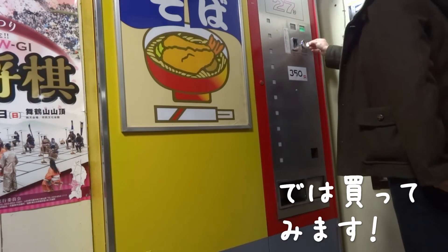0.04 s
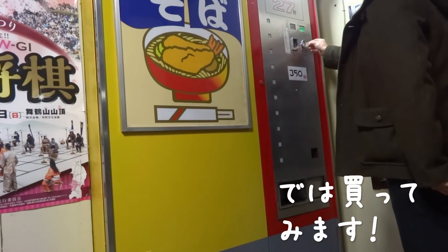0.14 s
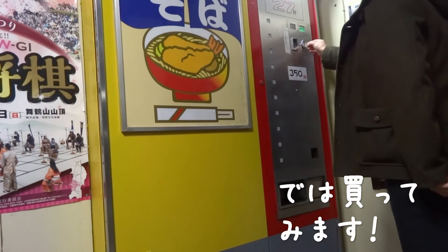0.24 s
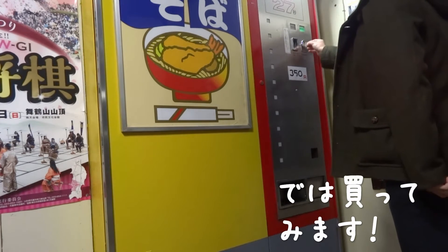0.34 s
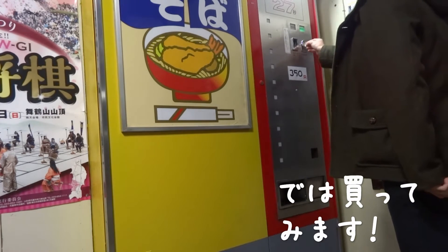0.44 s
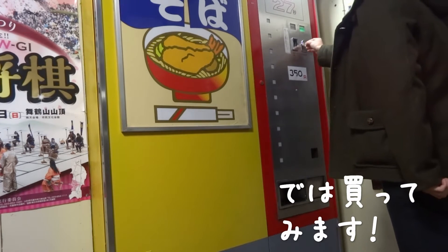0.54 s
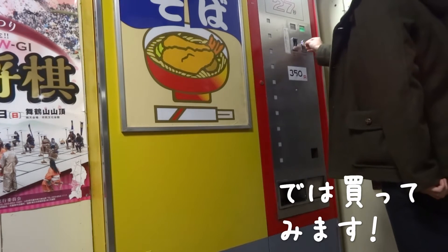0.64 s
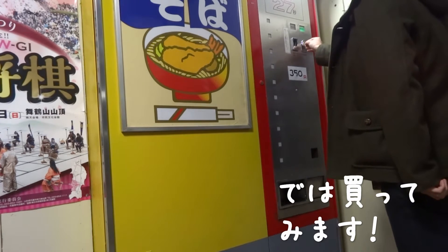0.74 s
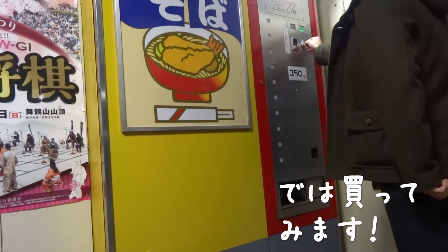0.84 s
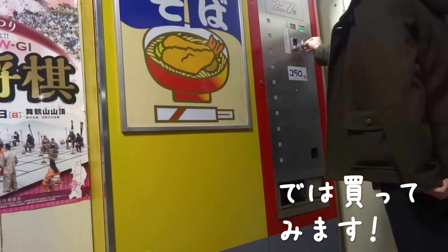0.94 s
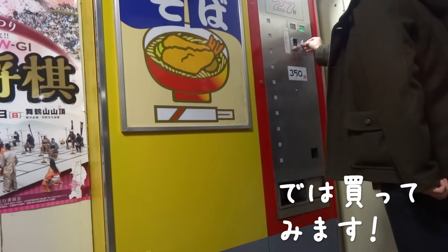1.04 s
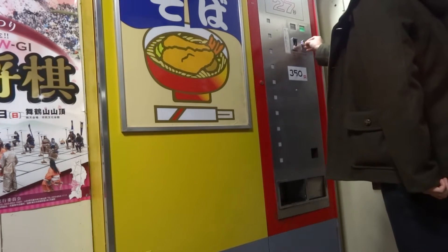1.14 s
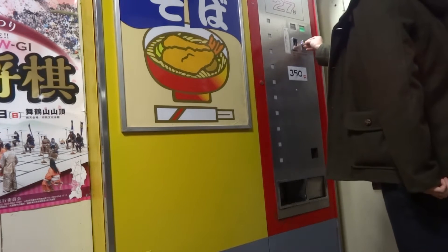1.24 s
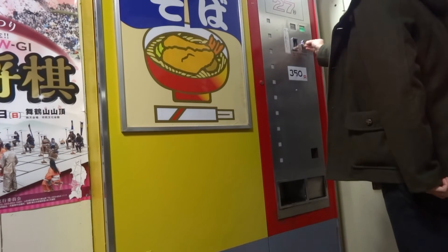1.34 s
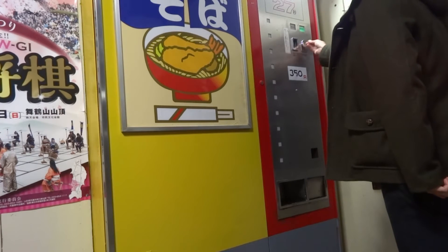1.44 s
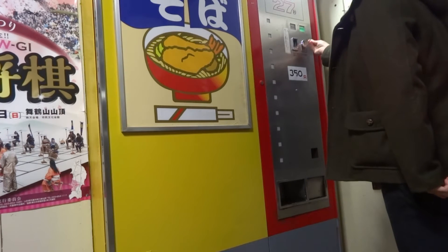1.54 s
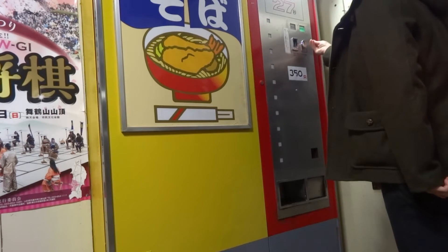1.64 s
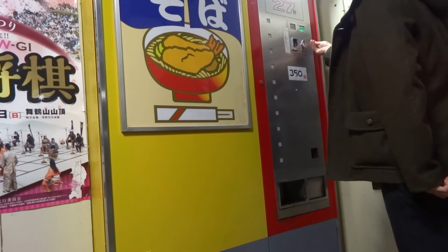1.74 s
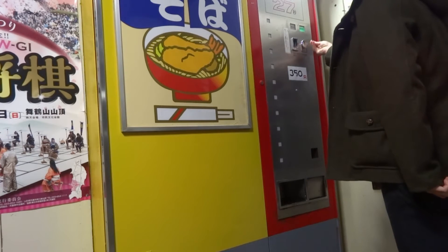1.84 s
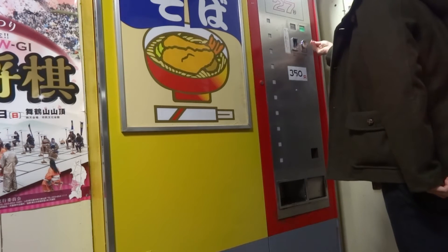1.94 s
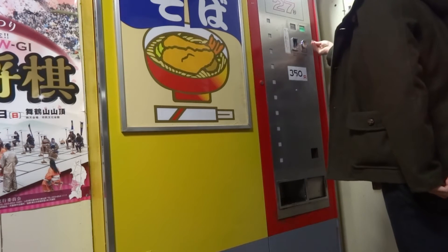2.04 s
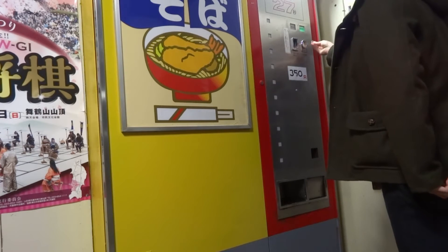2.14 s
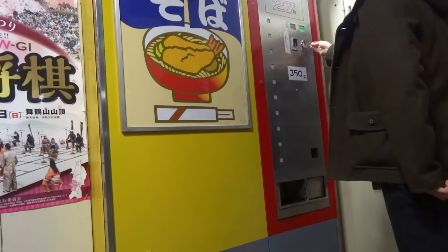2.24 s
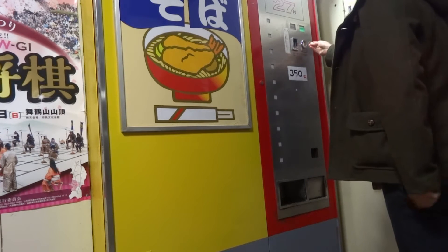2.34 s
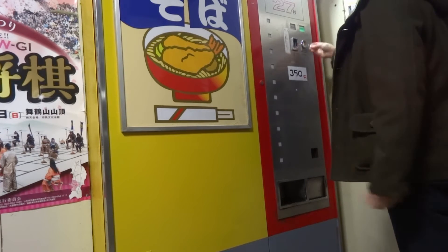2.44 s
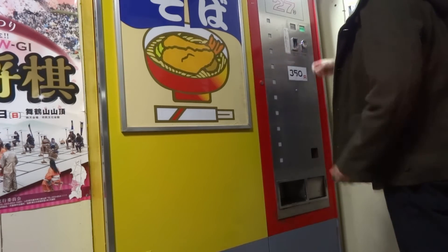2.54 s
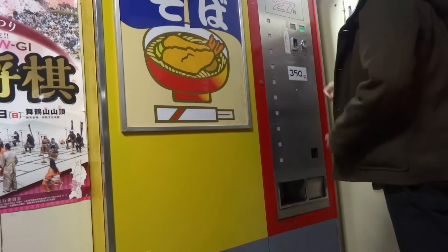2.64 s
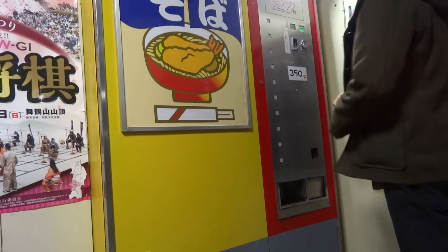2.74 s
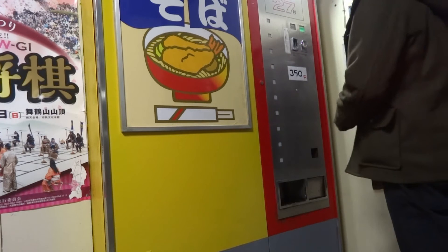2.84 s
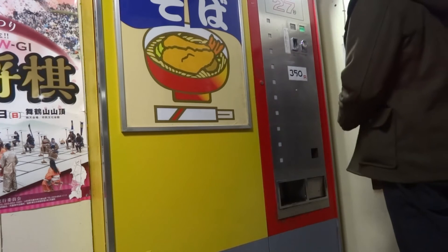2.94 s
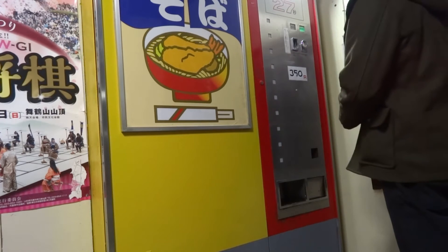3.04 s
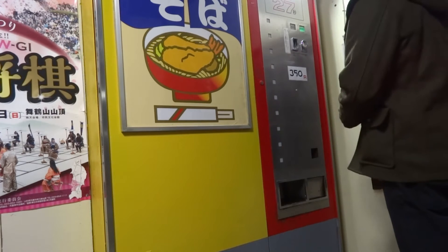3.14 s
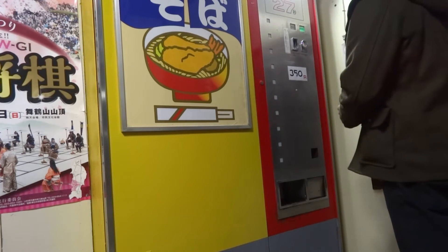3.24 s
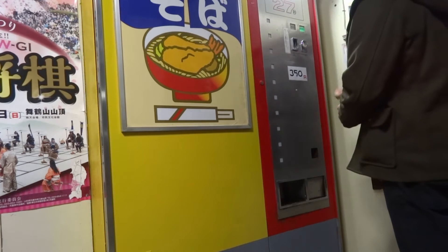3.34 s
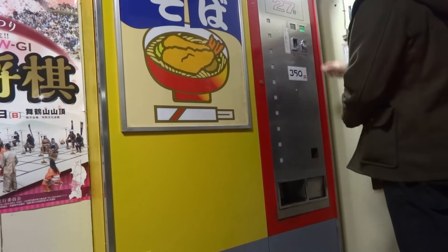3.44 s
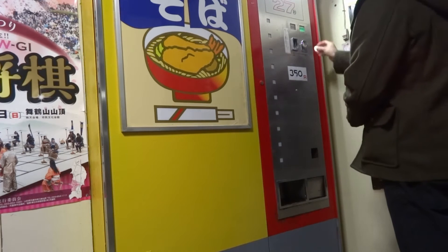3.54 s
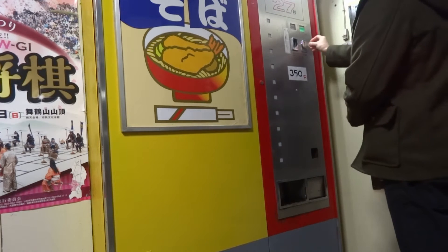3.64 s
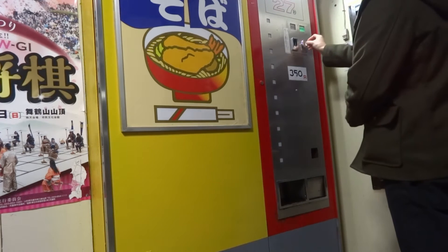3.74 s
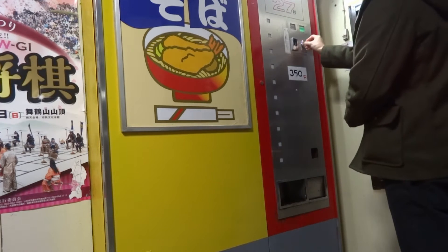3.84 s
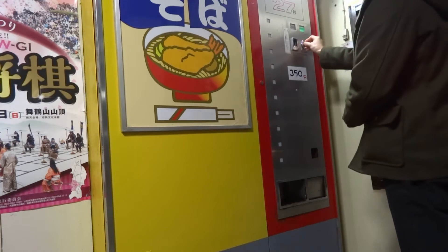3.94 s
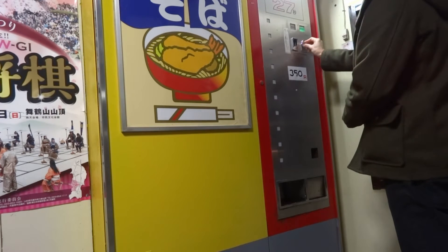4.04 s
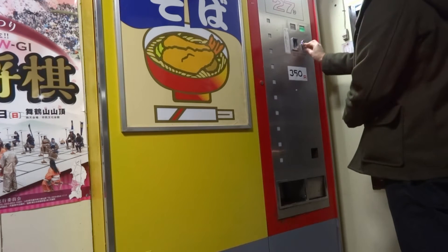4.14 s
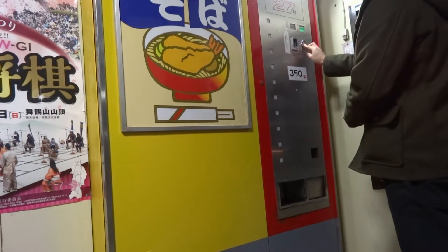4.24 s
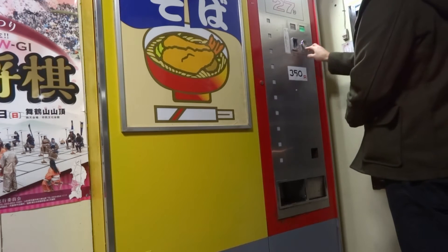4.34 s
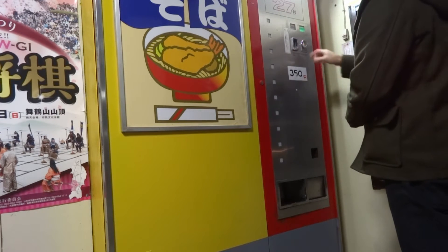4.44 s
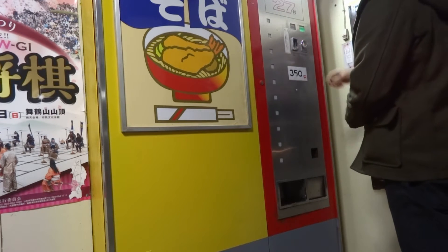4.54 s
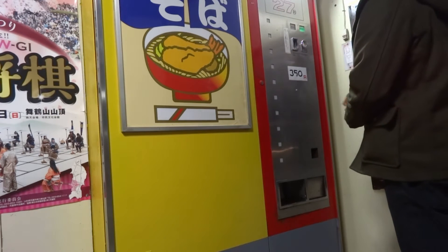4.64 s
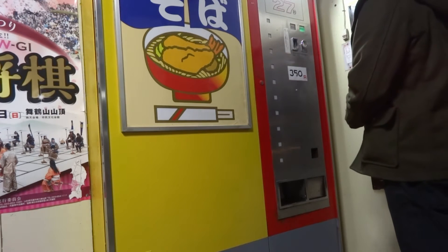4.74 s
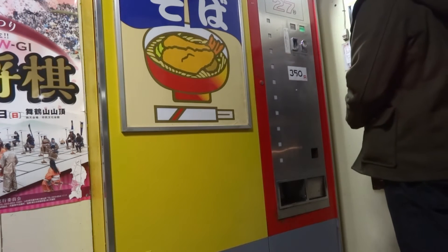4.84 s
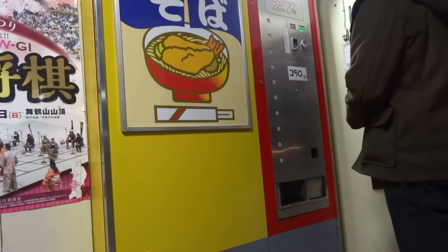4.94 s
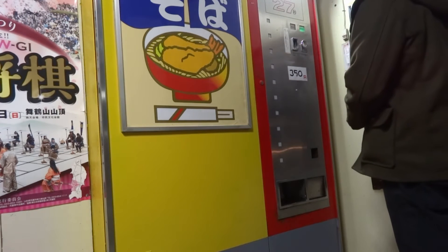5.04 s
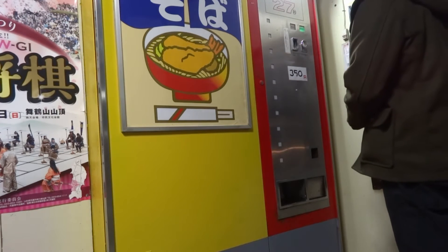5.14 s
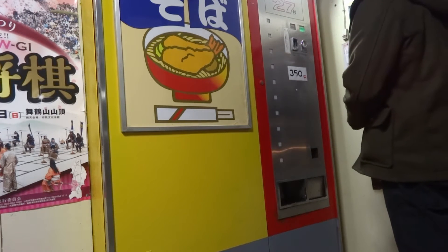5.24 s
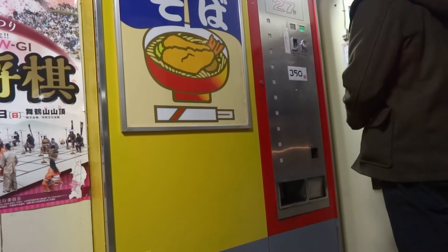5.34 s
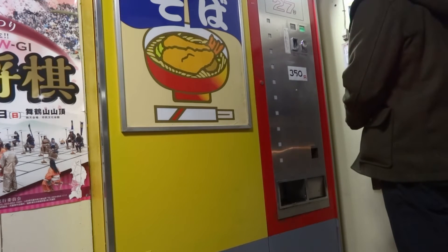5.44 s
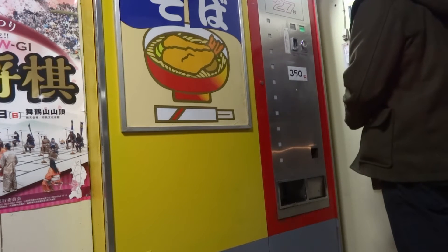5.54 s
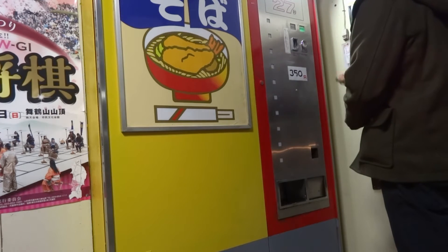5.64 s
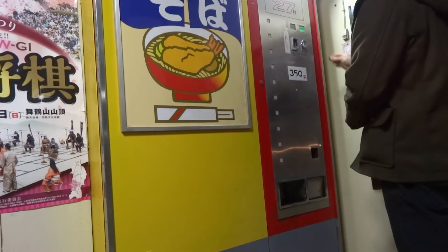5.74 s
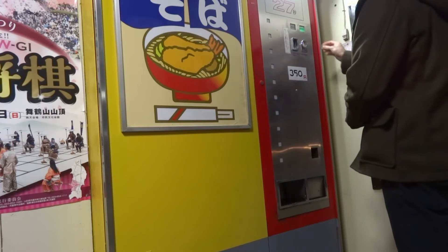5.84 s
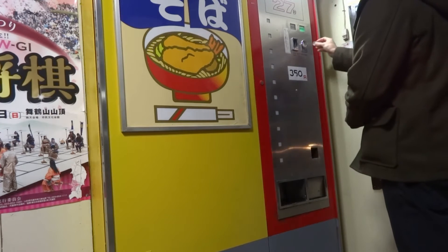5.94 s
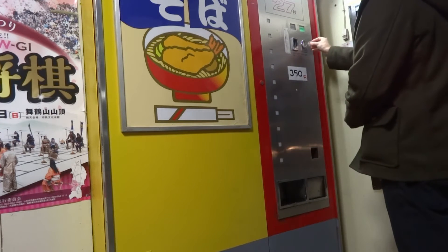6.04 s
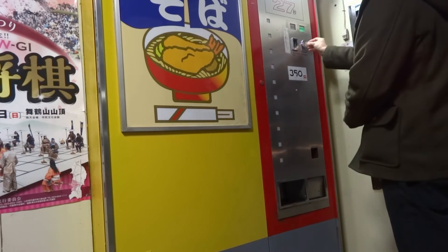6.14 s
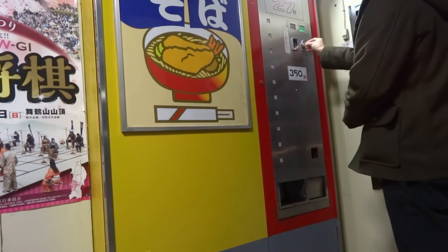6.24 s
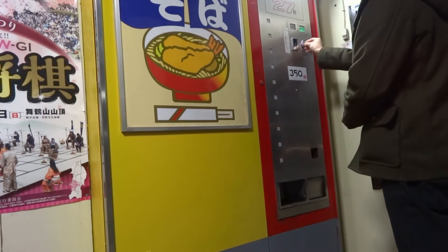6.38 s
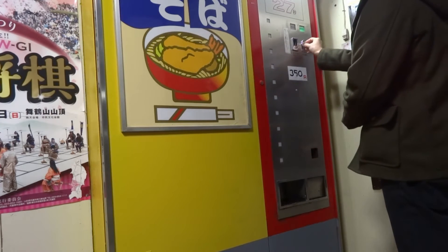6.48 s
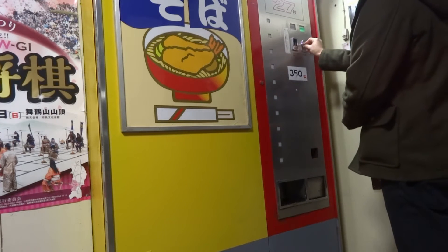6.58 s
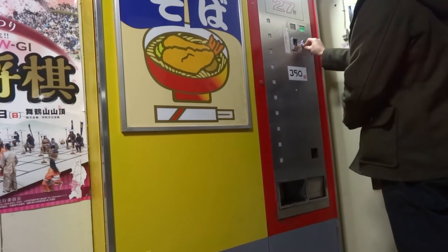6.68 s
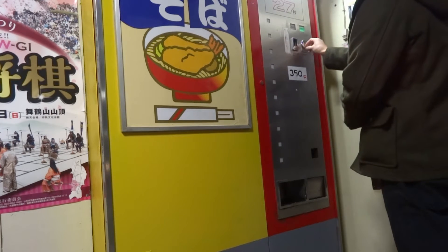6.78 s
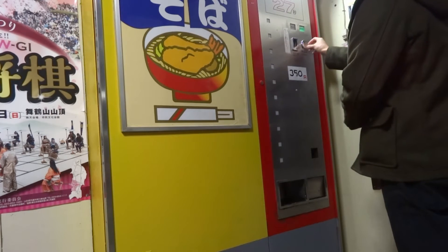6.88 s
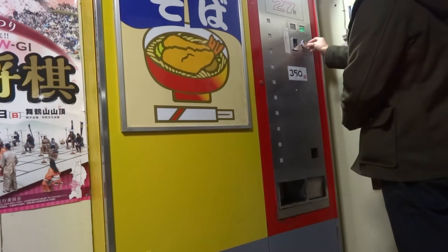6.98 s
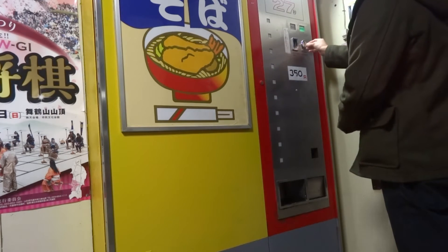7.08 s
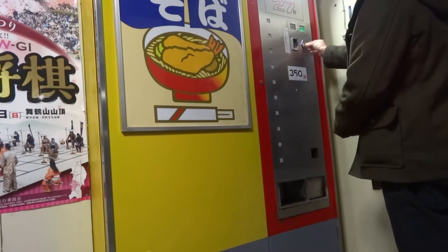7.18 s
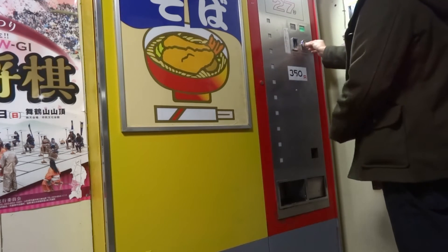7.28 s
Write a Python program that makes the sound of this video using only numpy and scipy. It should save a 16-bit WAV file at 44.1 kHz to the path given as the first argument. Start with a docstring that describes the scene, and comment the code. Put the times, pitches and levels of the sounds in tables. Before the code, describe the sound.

Three coins go one by one into a vending machine, clattering down a ringing metal chute over a steady fan hum.

```python
"""A small hard-walled shop, where coins are fed one by one into an old steel vending machine.
Each coin taps and scrapes the slot, clatters down a ringing sheet-metal chute and trips the checker;
the first two go on to roll along a ramp and bounce into the hollow cash box. Underneath, the fan and
motor hum, and a low rush, like a car passing outside, swells toward the end."""
import sys
import numpy as np
from scipy import signal
from scipy.fft import rfft, irfft, next_fast_len
from scipy.io import wavfile

SR = 44100
rng = np.random.default_rng(int(sys.argv[2]) if len(sys.argv) > 2 else 0)


def wrap_up_sound(samples):
    """Save the sound to the file named by the first command line argument, as 16-bit audio."""
    columns = np.atleast_2d(samples).T
    # keep every value between -1 and 1, then stretch to whole-number steps
    tamed = np.clip(columns, -1, 1)
    steps = np.round(tamed * 32767).astype(np.int16)
    wavfile.write(sys.argv[1], SR, steps)


N = 322371
TIME = np.arange(N) / SR

# Levels in the tables are relative: each layer has its own fader.
# A coin striking the chute. Each row: start in seconds, level in dB, brightness in dB per octave,
# the frequency in Hz that this spot of the sheet favours.
CHUTE_HITS = [ (1.2521, -26, -0.5, 2480), (1.3173, -31.5, -1, 2500), (1.35, -17, -0.2, 1340),
              (1.38, -13.5, 1, 1340), (1.4265, -14.5, 0, 1370), (1.4371, -18.5, -1, 1200),
              (4.2456, -23, 1.5, 2430), (4.3376, -13, 1, 3550), (4.3784, -14, 1.5, 1750),
              (4.398, -16.5, -1.5, 1850), (4.4471, -23.5, 0, 1310), (6.7348, -26.5, 3, 2440),
              (6.826, -14, 2, 1340), (6.8732, -12, 1, 4780), (6.8867, -19, 3, 4440),
              (6.9026, -17.5, -0.5, 2750), (6.9235, -24, 0, 2550)]
# Clusters of ringing tones on each blow; the last is a faint, thin high ring.
# Each row: centre in Hz, width in Hz, level in dB.
RING_CLUSTERS = [(839, 39, -3.5), (1050, 62.6, -2.5), (1340, 31.4, 1), (1666, 59.6, -4.5), (1870, 47, -21),
                 (2434, 103.5, -6.5), (2750, 31, -1.5), (2890, 38, -4.5), (3550, 58.6, -2), (4070, 58, -1),
                 (4200, 34, -14), (5050, 21, -5.5), (5900, 15, 7), (5770, 57, -9), (6020, 16, -3),
                 (6850, 150, 1.5), (6950, 220, -33), (8300, 22, 5), (7520, 43, -25), (7600, 73, -25),
                 (8240, 130, 3.5), (8150, 71, -16), (8950, 130, -28), (10500, 40, -30)]
# The hollow colour of the chute. Each row: frequency in Hz, gain in dB.
CHUTE_EQ = [(650, -3), (1050, -7.5), (1330, 0.5), (1480, -2.5), (1730, 0.5), (2150, -5), (2560, 6),
            (2880, -1.5), (3200, -4.5), (3600, 1), (4200, 5.5), (5500, 1), (6900, 2), (9500, -2)]
# Knocks on the checker's levers and guides. Each row: start in seconds, level in dB, brightness in
# dB per octave, resonance of the struck part in Hz, its strength in dB.
CHECKER_KNOCKS = [(1.77, -30, 6, 1390, 7.5), (1.833, -26.5, 6, 5200, -14), (1.844, -23, 2, 5640, -9),
                  (1.9999, -37, 2, 1410, -4), (2.3464, -28, -1, 1410, -14), (2.412, -26, 2, 3080, 9),
                  (2.4311, -19.5, 2.5, 3780, 12), (2.4646, -26, -0.5, 3800, 11),
                  (4.5927, -29.5, 3, 1070, -6), (4.7494, -28.5, 4, 2133, 0), (4.790, -19, 6.5, 1740, -2),
                  (5.3376, -28, -3.5, 1410, -4), (5.3779, -18.5, 2.5, 2650, 8.5),
                  (5.3989, -27.5, -3, 2240, 9), (5.439, -23.5, 3, 4100, 6), (7.2439, -28.5, 5, 910, 5),
                  (7.297, -24, 5.5, 1700, -4)]
# Landings on the ramp. Each row: time in seconds, level in dB.
RAMP_LANDINGS = [(2.1284, -25.5), (5.103, -25)]
# Drops into the box. Each row: start in seconds, level in dB, first flight in seconds,
# loss per bounce in dB.
BOX_DROPS = [(2.5497, -19.5, .038, 12.5), (5.5499, -19, .075, 7.5)]
# A coin touching the slot plate or other coins. Each row: start in seconds, level in dB,
# brightness in dB per octave, ring in Hz.
SLOT_TAPS = [(0.3396, -41.5, 2, 3680), (0.5195, -51.5, 5.5, 9000), (0.733, -53, 10, 7580),
             (0.757, -45, -6, 3700), (0.9954, -59, 18, 10600), (1.0241, -39, -1.5, 10200),
             (1.11, -54, 13.5, 10000), (1.2133, -33, 12.5, 10500), (3.422, -37.5, 6, 7500),
             (3.8144, -29.5, -3, 8560), (3.9527, -26, 0, 7440), (4.211, -29.5, 1, 7900),
             (6.2951, -35.5, 8.5, 7660), (6.309, -31, -1.5, 9400), (6.4056, -37, -6.5, 9700),
             (6.6072, -35.5, -4, 7800)]
# Fingers pushing a coin along the slot. Each row: start in seconds, length in seconds, level in dB.
SLOT_PUSHES = [(1.213, 0.12, -45), (3.925, 0.13, -45), (4.18, 0.02, -45), (6.7, .02, -43.5),
               (6.766, .065, -37.5)]
# The colour of that rubbing. Each row: frequency in Hz, gain in dB.
SCRAPE_EQ = [(200, -40), (1000, 4), (3000, 2.5), (6300, 0.5), (8000, -2), (10400, -1)]
# Rolls down a stretch of ramp. Each row: start in seconds, length in seconds, level in dB.
RAMP_ROLLS = [(2.134, 0.17, -43.5), (2.324, 0.14, -38.5), (5.129, 0.17, -43), (5.315, 0.058, -39)]
# The colour of the ramp. Each row: frequency in Hz, gain in dB.
RAMP_EQ = [(90, -45), (400, -25), (1050, -12.5), (1400, -3), (1700, -6), (2100, -8.5), (3000, -4),
           (4000, -5), (5200, -9.5), (10000, -22)]
# The edges in Hz of a contact's low, middle, main and top bands.
BAND_EDGES = [250, 900, 3000, 7000, 10500]
# The balance of each kind of contact. Each lists the low, middle, main and top band in dB.
TAP_BANDS_DB = (-25.5, -9.5, -5, -12)
CLATTER_BANDS_DB = (-20.5, -4, -10.5, -9)
RING_BANDS_DB = (-17, .5, -6, -19.5)
KNOCK_BANDS_DB = (-17.5, -11, -11, -18.5)
BOX_BANDS_DB = (-19, -9, -12.5, -15)
# The shop's reverb tail. Each row: frequency in Hz, time to fall 60 dB in seconds.
SHOP_T60 = [(300, 0.53), (800, 0.79), (2000, 0.66), (5500, 0.58), (10000, 0.46)]
# The colour of the fan. Each row: frequency in Hz, gain in dB.
FAN_EQ = [(35, -77), (60, -44.5), (158, -16.5), (197, -18.5), (277, -4.5), (344, -12), (375, -5), (508, -7),
          (553, -5.5), (870, -12.5), (991, -5.5), (1150, -16), (2300, -14.5), (3240, -22.5), (10400, -27.5),
          (13500, -80), (22000, -120)]
# The motor's tones. Each row: pitch in Hz, level in dB.
MOTOR_TONES = [(301.5, -88), (371.4, -69.5), (570.6, -73), (812.9, -90.5), (1017, -88), (1297, -74.5)]
# The colour of the tyre rush. Each row: frequency in Hz, gain in dB.
TYRE_EQ = [(35, -84), (60, -31), (166, -17), (353, -1.5), (422, -9.5), (617, -4), (695, -6.5), (783, -6),
           (1100, -5.5), (1420, -9.5), (2490, -12), (4790, -30.5), (7000, -28.5), (9100, -50),
           (15400, -120)]

TIP_OVER_S = .019  # from the touch of a falling coin's rim to the slap of its face
BOX_NOTE_HZ = 728


def chute_blows(rebound_s=.048, loss_db=18.5):
    """Each blow on the chute, then its weaker rebound off the opposite wall."""
    for s, peak_db, tilt_db, spot_hz in CHUTE_HITS:
        yield s, peak_db, tilt_db, spot_hz
        yield s + rebound_s * rng.uniform(.85, 1.15), peak_db - loss_db, tilt_db, spot_hz


def chute_clatter(level_db=-6.0, cabinet_hz=235):
    """The noisy attack of each blow, coloured by the hollow chute, with a low boom of the cabinet."""
    out = np.zeros(N)
    for s, peak_db, tilt_db, spot_hz in chute_blows():
        bands = band_levels(peak_db, tilt_db, CLATTER_BANDS_DB)
        blow = contact(bands, rise_s=0.0044, t60=0.039, crack=2.1, bass_db=-11.0)
        add(out, s, emphasise(blow, spot_hz, q=8.1, gain_db=1.5))
    return from_db(level_db) * emphasise(colour(out, CHUTE_EQ), cabinet_hz, q=12.0, gain_db=11.0)


def chute_ring(level_db=-33.5, spread_db=2.5, pan_db=2.0, rise_s=0.0017, detune=0.4125,
               spot_db=7.5, spot_octaves=0.13):
    """The metallic ring: each blow lands elsewhere and wakes other tones of each cluster."""
    out, t = np.zeros((2, N)), TIME[:SR * 3 // 4]
    centre, width, tone_db = np.repeat(RING_CLUSTERS, 3, axis=0).T  # three tones per cluster
    t60 = .6 * (centre / 1000) ** -.55  # high tones die sooner
    envelope = (1 - np.exp(-t / rise_s)) * from_db(-60 * t / t60[:, None])
    for s, peak_db, tilt_db, spot_hz in chute_blows():
        pitch, strength, phase, side = rng.standard_normal((4, len(centre)))
        hz = centre + detune * width * pitch
        blow_db = at_hz(band_levels(peak_db, tilt_db, RING_BANDS_DB), centre)
        favour_db = spot_db * np.exp(-(np.log2(centre / spot_hz) / spot_octaves) ** 2)
        gain = np.sqrt(width) * from_db(blow_db + tone_db + favour_db + spread_db * strength)
        tones = envelope * np.sin(2 * np.pi * (hz[:, None] * t + phase[:, None]))
        for channel, sign in zip(out, (1, -1)):
            add(channel, s, (gain * from_db(sign * pan_db * side)) @ tones)
    return from_db(level_db) * out


def knocks(level_db=-4.0, firm_db=-27.5, slide_per_db=1.38):
    """Damped clacks on the checker, ramp and box, each with the broad resonance of the struck part."""
    out = np.zeros(N)
    levers = [(*knock, KNOCK_BANDS_DB) for knock in CHECKER_KNOCKS]
    for s, peak_db, tilt_db, hz, ring_db, bands_db in [*levers, *ramp_landings(), *box_bounces()]:
        bands = band_levels(peak_db, tilt_db, bands_db)
        slide = 1 + slide_per_db * max(firm_db - peak_db, 0)  # weak contacts glance off, drawn out
        knock = contact(bands, rise_s=0.003 * slide, t60=0.041 * slide, crack=3.2 / slide, bass_db=-13.0)
        add(out, s, emphasise(knock, hz, q=1.9, gain_db=ring_db) / np.sqrt(slide))
    return from_db(level_db) * out


def ramp_landings(tilt_db=3, ring_hz=4060, ring_db=6.5, graze_loss_db=6.5):
    """A coin grazes the ramp with its rim, then slaps down flat."""
    for s, peak_db in RAMP_LANDINGS:
        yield s - TIP_OVER_S, peak_db - graze_loss_db, tilt_db, ring_hz, ring_db, KNOCK_BANDS_DB
        yield s, peak_db, tilt_db, ring_hz, ring_db, KNOCK_BANDS_DB


def box_bounces(tilt_db=0.1, dulling_db=0.5, ring_hz=4600, ring_db=-2, hollow_db=3, restitution=.9):
    """A coin hits the box rim first, then bounces, ever sooner, weaker and duller."""
    for s, peak_db, flight_s, loss_db in BOX_DROPS:
        yield s, peak_db - 1.5, tilt_db, ring_hz, ring_db, KNOCK_BANDS_DB
        s += TIP_OVER_S
        for k in range(5):
            # The hollow box takes over: the resonance grows and sinks toward its note.
            hz = BOX_NOTE_HZ + (ring_hz - BOX_NOTE_HZ) * 2 ** (-2.8 * k)
            resonance_db = ring_db + k * hollow_db
            yield s, peak_db - k * loss_db, tilt_db - k * dulling_db, hz, resonance_db, BOX_BANDS_DB
            s += flight_s * restitution ** k


def box_boom(level_db=-36.5, width_hz=203, hold_s=.11):
    """The hollow box booms briefly under each drop: a narrow band of noise around its note."""
    envelope = sum(from_db(db + swell_db(s + TIP_OVER_S, hold_s, rise_db_per_s=300, fall_db_per_s=130))
                   for s, db, *_ in BOX_DROPS)
    edges_hz = [BOX_NOTE_HZ - width_hz / 2, BOX_NOTE_HZ + width_hz / 2]
    band = signal.butter(2, edges_hz, "band", fs=SR, output="sos")
    return from_db(level_db) * envelope * rms_one(signal.sosfilt(band, rng.standard_normal(N)))


def slot_taps(level_db=-4.5):
    """Sharp ticks on the slot plate; the fingers damp the ring of the coin."""
    out = np.zeros(N)
    for s, peak_db, tilt_db, ring_hz in SLOT_TAPS:
        bands = band_levels(peak_db, tilt_db, TAP_BANDS_DB)
        tick = contact(bands, rise_s=0.00054, t60=0.017, crack=5.3, bass_db=7.0)
        add(out, s, emphasise(tick, ring_hz, q=9.7, gain_db=10.0))
    return from_db(level_db) * out


def slot_scrape(level_db=-9.5):
    """The milled edge catches on the slot in fine grains during each push."""
    pressure = sum(from_db(db + swell_db(s, length_s, rise_db_per_s=453, fall_db_per_s=223))
                   for s, length_s, db in SLOT_PUSHES)
    return from_db(level_db) * pressure * grains(per_s=1500, spectrum=SCRAPE_EQ)


def ramp_roll(bumps_db=-6.5, ring_db=-9.5, ring_hz=1536.0, glide_hz_per_s=-350):
    """The rim drums on the ramp in tiny bumps; the resonance sinks as the coin travels."""
    pressure, hz = np.zeros(N), np.full(N, ring_hz)
    for s, length_s, db in RAMP_ROLLS:
        rolling = (TIME > s) & (TIME < s + length_s)
        elapsed = TIME[rolling] - s
        pressure[rolling] += from_db(db) * np.sin(np.pi * elapsed / length_s) ** 0.3
        hz[rolling] = ring_hz + glide_hz_per_s * elapsed
    bumps = grains(per_s=1400, spectrum=RAMP_EQ)
    ring = resonate(bumps, hz, width_hz=300)
    return pressure * (from_db(bumps_db) * bumps + from_db(ring_db) * ring)


def shop_reverb(x, build_s=0.0022):
    """Dense reflections off the hard walls build up and die away, the treble first."""
    t, hz = TIME[:SR], np.arange(SR // 2 + 1)
    noise = rfft(diffuse(SR, side_db=-10.5))
    tail = 0
    for centre, t60 in SHOP_T60:
        band = at_hz([(other, other == centre) for other, _ in SHOP_T60], hz)
        tail = tail + irfft(noise * band) * from_db(-60 * t / t60)
    response = rms_one(tail * (1 - np.exp(-t / build_s))) / np.sqrt(SR)
    return signal.fftconvolve(x[None], response, axes=1)[:, :N]


def machine_hum(fan_db=-55.0, motor_gain_db=4.5):
    """A bed of fan noise, with unsteady tones of the motor and its housing."""
    fan = from_db(fan_db) * rms_one(colour(diffuse(N, side_db=-12.5), FAN_EQ))
    motor = sum(from_db(db + motor_gain_db) * resonate(rng.standard_normal(N), hz, width_hz=10.4)
                for hz, db in MOTOR_TONES)
    return fan + motor


def passing_car(nearest_s=6.58, nearest_m=7.51, speed_m_per_s=14, rush_db=-43.5,
                drone_hz=342, drone_db=-45.5, waver_hz=12.2, flutter_db=2.5):
    """Tyre rush follows the car's nearness; a rough drone swells and sinks by the Doppler shift."""
    along_m = speed_m_per_s * (TIME - nearest_s)
    distance_m = np.hypot(along_m, nearest_m)
    tyres = rms_one(colour(diffuse(N, side_db=-10.5), TYRE_EQ))
    rush = from_db(rush_db) * nearest_m / distance_m * tyres
    doppler = 1 + speed_m_per_s / 343 * along_m / distance_m  # sound travels at 343 m/s
    fade_db = swell_db(start_s=6.27, hold_s=0, rise_db_per_s=24, fall_db_per_s=77)
    envelope = from_db(drone_db + fade_db + flutter_db * drift(33))
    hz = drone_hz / doppler + waver_hz * drift(90)
    return rush + envelope * np.sin(2 * np.pi * np.cumsum(hz) / SR)


def contact(bands, rise_s, t60, crack, bass_db, chatter_db=3.0, chatter_per_s=500):
    """A first crack, then a dense rattle of tiny rebounds that builds and dies in the steel case."""
    t = TIME[:SR // 4]
    envelope = (1 - np.exp(-t / rise_s)) * from_db(-60 * t / t60)
    rebounds = from_db(chatter_db * np.interp(t * chatter_per_s, np.arange(400), rng.standard_normal(400)))
    burst = rms_one(rng.standard_normal(len(t)) * rebounds * envelope)
    burst *= np.sqrt(np.mean(envelope ** 2)) / envelope.max()  # about unit power at the crest
    burst[0] += crack
    density_db = bands[:, 1] - 10 * np.log10(np.diff(BAND_EDGES) / (SR / 2))
    low_end = [(80, density_db[0] - 44), (200, density_db[0] + bass_db)]
    return colour(burst, low_end + list(zip(bands[:, 0], density_db)))


def band_levels(peak_db, tilt_db, bands_db, bass_lag=0.25, middling_db=-24):
    """A contact's four bands as (Hz, dB), tilted about the main one; the low tilts with the middle."""
    edges = np.array(BAND_EDGES)
    hz = np.sqrt(edges[1:] * edges[:-1])
    db = peak_db + np.array(bands_db) + tilt_db * np.log2(np.maximum(hz, hz[1]) / hz[2])
    db[0] -= bass_lag * (peak_db - middling_db)  # harder contacts are shorter, so their bass lags
    return np.column_stack([hz, db])


def grains(per_s, spectrum):
    """Tiny random impacts on a body of the given colour, at unit power."""
    impacts = (rng.random(N) < per_s / SR) * rng.standard_normal(N)
    return rms_one(colour(impacts, spectrum))


def emphasise(x, hz, q, gain_db):
    """Blend in one resonance."""
    return x + from_db(gain_db) * signal.lfilter(*signal.iirpeak(hz, q, fs=SR), x)


def resonate(drive, hz, width_hz):
    """A resonance whose centre may glide, at unit power."""
    carrier = np.exp(2j * np.pi * np.cumsum(hz * np.ones(N)) / SR)
    pole = np.exp(-np.pi * width_hz / SR)
    return rms_one((carrier * signal.lfilter([1], [1, -pole], drive / carrier)).real)


def colour(x, spectrum):
    """Minimum-phase EQ: nothing rings ahead of the attack."""
    size = next_fast_len(x.shape[-1] // 2 + 1024) * 2
    hz = np.arange(size // 2 + 1) * SR / size
    cepstrum = irfft(np.log(from_db(at_hz(spectrum, hz))))
    cepstrum[1:size // 2] *= 2
    cepstrum[size // 2 + 1:] = 0
    return irfft(rfft(x, size) * np.exp(rfft(cepstrum)))[..., :x.shape[-1]]


def swell_db(start_s, hold_s, rise_db_per_s, fall_db_per_s):
    """Attack, hold and release, in dB below the top; the hold begins at start_s."""
    attack = -rise_db_per_s * np.maximum(start_s - TIME, 0)
    return attack - fall_db_per_s * np.maximum(TIME - start_s - hold_s, 0)


def diffuse(count, side_db):
    """Stereo noise from all around; side_db sets the width."""
    mid, side = rng.standard_normal((2, count))
    return mid + from_db(side_db) * side * [[1], [-1]]


def drift(per_s):
    """A wander between random values."""
    return np.interp(TIME * per_s, np.arange(2000), rng.standard_normal(2000))


def at_hz(points, hz):
    """Read a curve on a log-frequency axis."""
    points = np.array(points)
    return np.interp(np.log(hz + 1), np.log(points[:, 0]), points[:, 1])


def add(track, s, sound):
    """Mix a sound into the track at s seconds."""
    start = int(s * SR)
    track[start:start + len(sound)] += sound[:max(N - start, 0)]


def from_db(db):
    """Decibels to gain."""
    return 10 ** (np.asarray(db) / 20)


def rms_one(x):
    """Scale to unit power."""
    return x / np.sqrt(np.mean(x ** 2) + 1e-20)


def scene(inside_send_db=4.5, tap_send_db=5.0, scrape_send_db=10.0, left_db=-1.03, right_db=0.5):
    """The coin mechanism sits a little to the right, heard mostly by way of the walls."""
    taps, scrape = slot_taps(), slot_scrape()
    inside = chute_clatter() + knocks() + ramp_roll() + box_boom()
    send = from_db(inside_send_db) * inside + from_db(tap_send_db) * taps
    walls = shop_reverb(send + from_db(scrape_send_db) * scrape)
    coins = taps + scrape + inside + chute_ring() + walls
    return coins * from_db([[left_db], [right_db]]) + machine_hum() + passing_car()


def record(dry, low_cut_hz=110, high_cut_hz=10530):
    """Thin bass, and no treble above about 10.5 kHz."""
    thin = signal.sosfilt(signal.butter(2, low_cut_hz, "high", fs=SR, output="sos"), dry)
    return signal.sosfilt(signal.ellip(14, .1, 80, high_cut_hz, fs=SR, output="sos"), thin)


dry = scene()
out = record(dry)
wrap_up_sound(out)
```